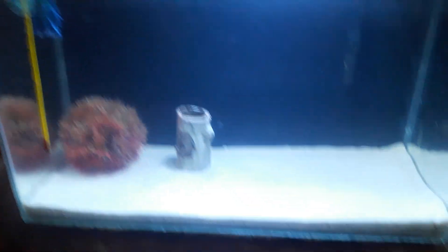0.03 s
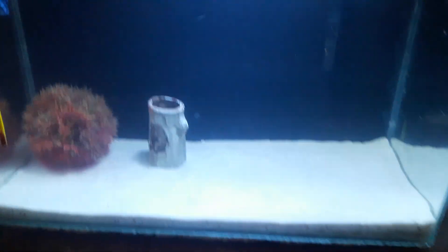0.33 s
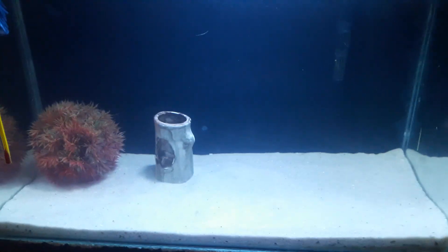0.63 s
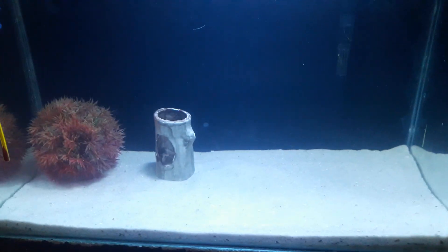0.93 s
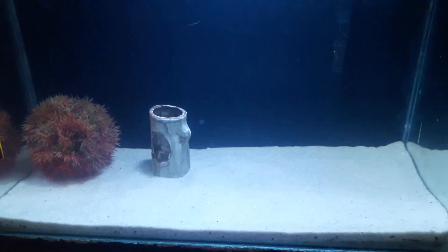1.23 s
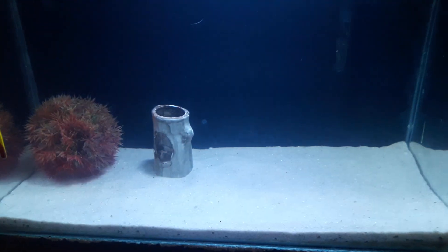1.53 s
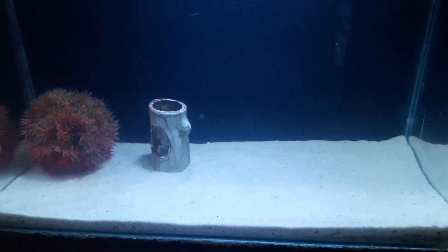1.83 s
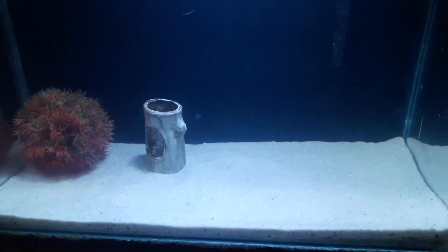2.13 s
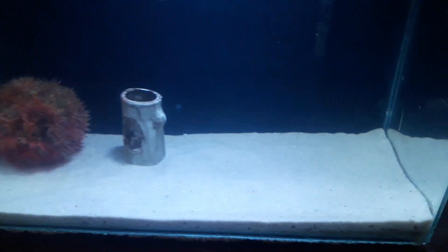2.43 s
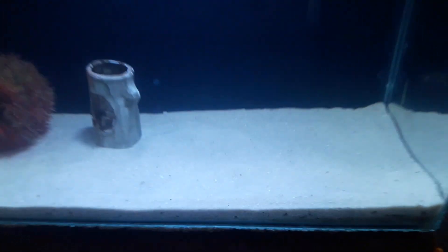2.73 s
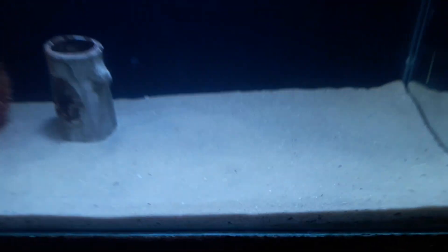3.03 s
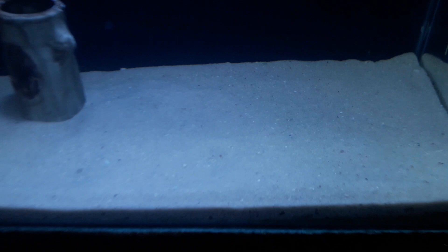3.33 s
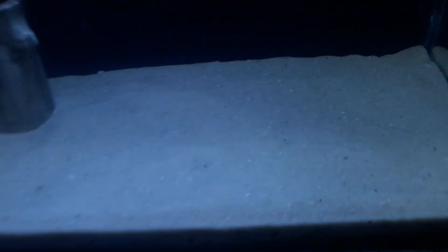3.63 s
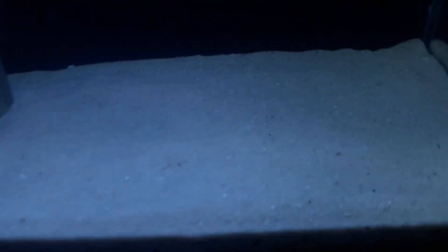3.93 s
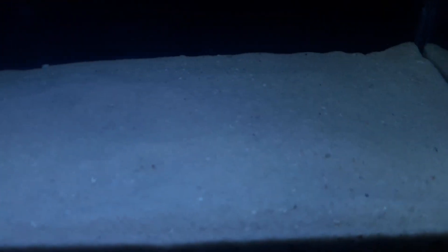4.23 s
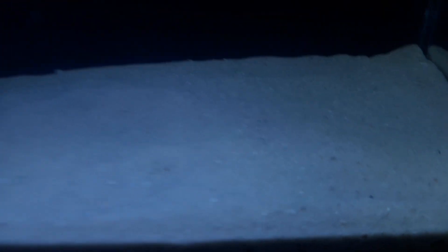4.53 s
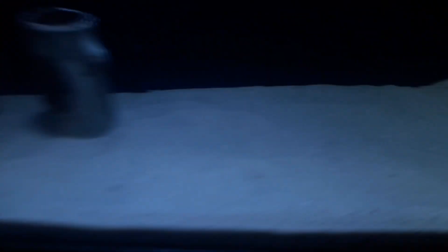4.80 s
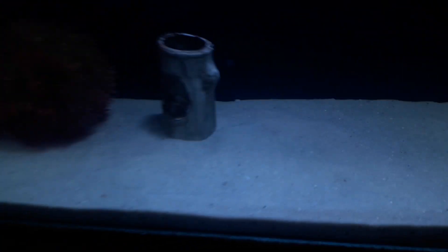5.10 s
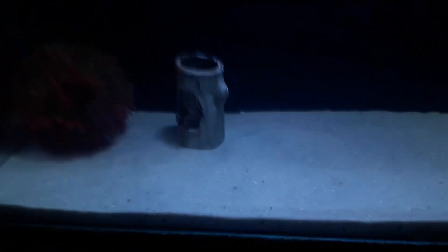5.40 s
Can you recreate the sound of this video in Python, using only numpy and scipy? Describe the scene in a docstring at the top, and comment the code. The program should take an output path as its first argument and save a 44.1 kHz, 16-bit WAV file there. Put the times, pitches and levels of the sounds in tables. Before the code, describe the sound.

From start to finish, nearly six seconds, an aquarium filter pours a thin stream into a glass tank. Round, hollow plops come irregularly, several each second, over a fine tinkling trickle, light slaps of drops and a soft fluttering hiss of spray. Tiny surface bubbles pop crisply, most clearly in the first two seconds. One brighter plop stands out at about 1.4 seconds, and fuller ones follow until about 3 seconds. The water rings slightly in the tank, with a short echo from the quiet room. Underneath, the pump gives a low, steady, slightly wavering hum.

From about 2.7 seconds the close, hand-held microphone leans in, so the tinkling softens a little and the hum changes tone; it draws back by 5.3 seconds. A faint dry handling tick sounds at about 0.1 seconds and a sharper one at 5.4 seconds.

```python
"""Round plops and a tinkling trickle: a hang-on filter pours a thin stream into an aquarium.
The stream drags air under, so big bubbles plop and small ones tinkle, while drops slap the water and
surface bubbles pop. The glass, the air in the tank and the walls of a quiet room throw the water back.
Behind it the pump hums on the mains and a few dry ticks sound right at the hand-held microphone,
which leans in and draws back, shifting the balance of hum and water."""
import sys
import numpy as np
from scipy import signal
from scipy.fft import rfft, irfft
from scipy.io import wavfile

SR = 44100
rng = np.random.default_rng(int(sys.argv[2]) if len(sys.argv) > 2 else 0)


def master(y):
    """Save y as 16-bit WAV."""
    cut = np.clip(np.atleast_2d(y).T, -1, 1)
    pcm = np.round(cut * 32767)  # scale
    wavfile.write(sys.argv[1], SR, pcm.astype(np.int16))


N = 249606
TIME = np.arange(N) / SR
FREQS = np.fft.rfftfreq(N, 1 / SR)


def amp(db):
    return 10 ** (np.asarray(db) / 20)


def unit_rms(x):
    return x / np.sqrt(np.mean(x ** 2) + 1e-20)


def curve_db(points, hz):
    """An EQ curve: straight lines between points on a log-frequency axis."""
    f, db = np.transpose(points)
    return np.interp(np.log(hz + 1), np.log(f + 1), db)


def add(mix, s, sound):
    part = mix[max(round(s * SR), 0):][:len(sound)]
    part += sound[:len(part)]


def noise(colour):
    """Steady coloured noise of rms 1."""
    return unit_rms(irfft(rfft(rng.standard_normal(N)) * amp(curve_db(colour, FREQS)), N))


def drift(rate_hz):
    """A smooth random modulator of rms 1."""
    spectrum = rfft(rng.standard_normal(N)) * np.exp(-(FREQS / rate_hz) ** 2) * (FREQS > 0)
    return unit_rms(irfft(spectrum, N))


def resonate(x, hz, q):
    return signal.lfilter(*signal.iirpeak(hz, q, SR), x)


def bell(x, hz, width_hz, db):
    """Boosts or cuts one band; db may be a curve."""
    return x + (amp(db) - 1) * resonate(x, hz, hz / width_hz)


def lean(s, start_s=2.71, in_s=1.0, end_s=5.26, out_s=0.52):
    """The microphone's move, 0 to 1: it leans in, holds and draws back."""
    return np.clip(np.minimum((s - start_s) / in_s, (end_s - s) / out_s), 0, 1)


# colour of the noise bed: f/Hz, relative level/dB
ROOM_TONE_EQ = [(20, -32), (45, -12), (65, -12), (88, -5.5), (110, -2), (160, -5), (220, 5), (290, -4.5),
                (420, -10), (700, -8), (1500, -30.5), (8500, -37), (12000, -35), (16000, -36)]
def room_tone(level_db=-52.5):
    """A steady bed of pump rumble, room air and microphone hiss."""
    return amp(level_db) * noise(ROOM_TONE_EQ)


# hum partials; leaning in crosses their standing waves: mains multiple, level/dB, change leaning in/dB
HUM_PARTIALS = [(2, -65.5, 7.5), (3, -55, 0.5), (4, -55.5, -4.5), (5, -68.5, 0.5), (7, -70.5, -2),
                (11, -61, -2)]
# fader curve of a faint drone that is no multiple of the mains: t/s, level/dB
DRONE_FADER = [(0.35, -81), (0.53, -60.5), (1.83, -66.5), (2.18, -75), (2.43, -61), (2.86, -79),
               (4.33, -67), (5.66, -83)]
def pump(mains_hz=60, drone_hz=88.7, drone_trim_db=-1, waver_db=2.0, waver_hz=12):
    """Mains harmonics and a low drone waver a little with the load on the impeller."""
    partials = [(round(k) * mains_hz, db + lean_db * lean(TIME)) for k, db, lean_db in HUM_PARTIALS]
    partials.append((drone_hz, drone_trim_db + np.interp(TIME, *np.transpose(DRONE_FADER))))
    out = np.zeros(N)
    for hz, db in partials:
        rms = amp(db + waver_db * drift(waver_hz))
        out += np.sqrt(2) * rms * np.sin(2 * np.pi * (hz * TIME + rng.random()))
    return out


# modes of the microphone's housing: f/Hz, relative level/dB, t60/s
HOUSING_MODES = [(137, -19, 0.016), (690, -12.5, 0.0087), (2350, -3.5, 0.0022), (4920, 5.5, 0.0022),
                 (6330, -3.5, 0.0036), (11250, -1, 0.0013)]
# taps on the housing: t/s, level/dB
TICK_CUES = [(0.1165, -38), (5.406, -35), (5.4153, -20)]
def ticks(size=3000):
    """Sharp taps ring the housing, too close to carry any room."""
    t, out = np.arange(size) / SR, np.zeros(N)
    tap = sum(amp(db - 60 * t / t60) * np.sin(2 * np.pi * hz * t) for hz, db, t60 in HOUSING_MODES)
    for s, db in TICK_CUES:
        add(out, s, -amp(db) * tap)
    return out


def room_reverb(x, t60=0.67, wet_db=-12, predelay_s=0.011, size=22000):
    """The walls answer with a short diffuse tail."""
    t = np.arange(size) / SR
    tail = rng.standard_normal(size) * amp(-60 * t / t60) * (t > predelay_s)
    return x + amp(wet_db) * signal.fftconvolve(x, tail / np.linalg.norm(tail))[:N]


# air resonances over the water: f/Hz, width/Hz, gain/dB
AIR_MODES = [(866, 28, 2.5), (958, 24, 2), (990, 20, -3), (1242, 18, -1), (1668, 16, 3.5), (1860, 16, 0),
             (2117, 26, 2), (2252, 14, -1), (2410, 14, 7), (2450, 16, 3), (2706, 13, 7.5), (3290, 24, -1)]
def tank_ring(x):
    """The air between glass and water rings on at a few pitches."""
    return sum(amp(db) * resonate(x, hz, hz / width) for hz, width, db in AIR_MODES)


# dips between the tank's resonances: f/Hz, width/Hz, gain/dB
TANK_DIPS = [(1057, 70, -6.5), (1770, 30, -4), (2280, 200, -4.5)]
def tank_hollow(x, rim_db=-2.5):
    """The tank swallows a few bands, and its rim shades the mids as the microphone leans in."""
    for hz, width, db in TANK_DIPS:
        x = bell(x, hz, width, db)
    return bell(x, hz=1280, width_hz=500, db=rim_db * lean(TIME))


# fader curve of the stream's splashing: t/s, level/dB
STREAM_FADER = [(0.0, -48.5), (0.22, -50), (2.47, -50.5), (3.39, -50.5), (3.78, -51.5), (5.49, -49),
                (5.66, -57.5)]
def stream_db(s):
    """How hard the stream splashes, in dB about the mean of the fader points."""
    times, db = np.transpose(STREAM_FADER)
    return np.interp(s, times, db - np.mean(db))


# colour of water striking water: f/Hz, relative level/dB
SPRAY_EQ = [(400, -55), (700, 1.5), (950, 0), (1300, -4), (2400, -13.5), (3200, -15.5), (4200, -18),
            (6800, -24), (8300, -49.5), (12000, -34), (16000, -29.5)]
def spray(level_db=-55.5, follow=1.53, lean_db=1.5, flutter_db=3.5, flutter_hz=30):
    """The finest spray merges into a fluttering hiss that lifts a little as the microphone leans in."""
    fader_db = level_db + follow * stream_db(TIME) + lean_db * lean(TIME)
    return noise(SPRAY_EQ) * amp(fader_db + flutter_db * drift(flutter_hz))


def burst(attack_s, decay_s, tail_db, tail_s, size):
    """A noise transient with a fast attack, a quick decay and a quiet tail."""
    t = np.arange(size) / SR
    envelope = (1 - np.exp(-t / attack_s)) * (np.exp(-t / decay_s) + amp(tail_db) * np.exp(-t / tail_s))
    return envelope * rng.standard_normal(size)


def pop(hz):
    """A bubble's skin bursts: a very high tick, a pitched core in a wide skirt, smeared by the glass."""
    snap = burst(attack_s=0.0012, decay_s=0.006, tail_db=-14, tail_s=0.08, size=5000)
    skirt = resonate(snap, hz, q=0.83)
    sound = resonate(skirt, hz, q=8)
    return sound / abs(sound).max()


# the crispest surface pops: t/s, level/dB, f/Hz
POP_CUES = [(0.019, -49, 13700), (0.0957, -45, 13000), (0.165, -53, 8200), (0.2, -46.5, 11300),
            (0.929, -42, 14200), (1.041, -49, 12100), (1.346, -51, 14600), (1.499, -53, 9800),
            (1.673, -53, 11900), (1.7135, -49, 13000), (1.8347, -47, 13300), (4.044, -41, 9550)]
def surface_pops(cue_trim_db=-1, per_s=34, crackle_db=-59.5, spread_db=3.5, lean_db=-3,
                 low_hz=9800, high_hz=15300, count=300):
    """Bubbles burst on the surface: crisp accents over a fine random crackle."""
    out = np.zeros(N)
    for s, db, hz in POP_CUES:
        add(out, s, amp(db + cue_trim_db) * pop(hz))
    draws = zip(rng.random((count, 2)), rng.standard_normal(count))
    for slot, ((jitter, smallness), strength) in enumerate(draws):
        s = (slot + 2 * jitter) / per_s
        db = crackle_db + stream_db(s) + lean_db * lean(s) + spread_db * min(strength, 2)
        add(out, s, amp(db) * pop(low_hz * (high_hz / low_hz) ** smallness))
    return out


# colour of a drop's slap: f/Hz, relative level/dB
SLAP_EQ = [(500, -40), (1000, 10.5), (2400, 3.5), (3100, -7), (4400, -5.5), (6800, -10.5), (8300, -18),
           (12000, -20), (16000, -28)]
def slap(boost_hz, boost_db=14, boost_octaves=0.54, size=6000):
    """A drop hits the water; the panes smear it into a short grainy burst with one band boosted."""
    hit = burst(attack_s=0.0016, decay_s=0.0076, tail_db=-11, tail_s=0.089, size=size)
    hz = np.fft.rfftfreq(2 * size, 1 / SR)
    boost = boost_db * np.exp(-(np.log2((hz + 1) / boost_hz) / boost_octaves) ** 2)
    sound = irfft(rfft(hit, 2 * size) * amp(curve_db(SLAP_EQ, hz) + boost))[:size]
    return sound / abs(sound).max()


# the sharpest drop hits and their boosted bands: t/s, level/dB, f/Hz
DROP_CUES = [(0.3473, -33.5, 3870), (0.5167, -41.5, 3270), (1.0837, -40.5, 3950), (1.222, -39, 4400),
             (1.3447, -36.5, 4700), (1.5982, -38, 4830), (1.673, -35.5, 3900), (1.712, -40, 5900),
             (1.8622, -43, 4000), (2.266, -34.5, 2370), (2.349, -35, 3500), (2.7045, -37, 3860),
             (2.9366, -39, 4840), (3.114, -35.5, 2550), (3.262, -35, 1250), (3.426, -43.5, 6100),
             (3.531, -39.5, 2060), (3.9656, -38, 5360), (4.084, -38.5, 1600), (4.342, -38.5, 2710),
             (4.7442, -38, 5100), (5.213, -35.5, 2870), (5.249, -37.5, 2800), (5.602, -37.5, 2050),
             (5.635, -29.5, 1390)]
def spatter(per_s=50, light_db=-50.5, spread_db=3, lean_db=-2, low_hz=1300, high_hz=7000, count=400):
    """Sharp drop hits among lighter random ones; each drop's size favours its own band."""
    out = np.zeros(N)
    for s, db, hz in DROP_CUES:
        add(out, s, amp(db) * slap(hz))
    draws = zip(rng.random(count), rng.standard_normal(count))
    for slot, (jitter, strength) in enumerate(draws):
        s = (slot + 2 * jitter) / per_s
        if s < N / SR:
            db = light_db + stream_db(s) + lean_db * lean(s) + spread_db * min(strength, 2)
            add(out, s, amp(db) * slap(low_hz * (high_hz / low_hz) ** rng.random()))
    return out


def bubble(hz, decay_cycles=5.64, attack_cycles=0.47, glass_db=-7.0, glass_t60=0.17, size=8000):
    """A pinched-off bubble swells and rings out, with quick reflections between the panes."""
    t, smallness = np.arange(size) / SR, hz / 950
    cycles = hz * t
    attack = 1 - np.exp(-cycles / attack_cycles)
    decay = np.exp(-cycles / decay_cycles * smallness ** 0.051)  # small bubbles die in fewer cycles
    ring = unit_rms(np.sin(2 * np.pi * cycles) * attack * decay)
    paths = rng.standard_normal(size) * amp(-60 * t / glass_t60) * np.clip(t / 0.0011 - 0.5, 0, 1)
    reflections = unit_rms(signal.fftconvolve(ring, paths)[:size])
    wet_db = glass_db + 5.0 * np.log2(smallness)  # the glass shades the direct treble
    sound = ring + amp(wet_db) * reflections
    return sound / abs(sound).max()


# bubble swarms, shaded by the rim: low f/Hz, high f/Hz, rate/(1/s), level/dB, change leaning in/dB
BUBBLE_SWARMS = [(735, 1054, 24, -50, -0.5), (1157, 2680, 85, -50, -5), (2940, 7130, 45, -56, -2)]
def trickle(spread_db=3.5, follow=0.98, max_per_swarm=400):
    """Faint bubbles tinkle at random, no two alike, louder when the stream splashes harder."""
    out = np.zeros(N)
    for low_hz, high_hz, per_s, swarm_db, lean_db in BUBBLE_SWARMS:
        draws = zip(rng.random((max_per_swarm, 2)), rng.standard_normal(max_per_swarm))
        for slot, ((jitter, smallness), strength) in enumerate(draws):
            s = (slot + 2 * jitter) / per_s
            if s < N / SR:
                db = swarm_db + follow * stream_db(s) + lean_db * lean(s) + spread_db * min(strength, 2)
                add(out, s, amp(db) * bubble(low_hz * (high_hz / low_hz) ** smallness, size=4000))
    return out


# foreground bubbles; most plop near 950 Hz, a few tiny ones tinkle: t/s, level/dB, f/Hz
PLOP_CUES = [(0.02, -39.5, 950), (0.095, -32, 976), (0.155, -32, 898), (0.219, -33.5, 3920),
             (0.346, -31, 2130), (0.451, -44, 4200), (0.464, -37, 930), (0.488, -36.5, 2430),
             (0.512, -37, 2440), (0.601, -29.5, 900), (0.604, -33, 2690), (0.617, -33.5, 2650),
             (0.741, -38, 1500), (0.85, -33.5, 1020), (0.863, -30.5, 815), (0.904, -35, 976),
             (0.93, -33.5, 847), (0.957, -34.5, 880), (1.017, -35.5, 960), (1.023, -40, 4040),
             (1.154, -34.5, 1215), (1.217, -33.5, 924), (1.344, -36.5, 770), (1.3665, -21.5, 1520),
             (1.394, -37.5, 920), (1.531, -28.5, 2174), (1.578, -25.5, 925), (1.721, -28.5, 970),
             (1.949, -26.5, 864), (1.963, -29.5, 883), (2.105, -36.5, 910), (2.266, -29.5, 2030),
             (2.291, -25, 963), (2.321, -29, 905), (2.404, -40.5, 927), (2.443, -33, 1640),
             (2.6, -25.5, 908), (2.654, -34, 927), (2.749, -25, 1010), (2.799, -30.5, 1210),
             (2.878, -29, 932), (2.999, -40, 4130), (3.113, -29.5, 946), (3.245, -41.5, 6230),
             (3.265, -29, 1260), (3.529, -29, 880), (3.893, -39.5, 914), (4.083, -30.5, 726),
             (4.158, -35, 756), (4.267, -35.5, 790), (4.479, -34.5, 956), (4.515, -40.5, 4900),
             (4.6471, -30.5, 908), (4.692, -29.5, 767), (4.706, -32, 980), (4.707, -36.5, 1680),
             (4.756, -30.5, 887), (4.79, -29, 947), (4.847, -33.5, 1610), (4.858, -41.5, 2450),
             (4.982, -31, 792), (4.984, -38.5, 370), (5.045, -43, 5740), (5.088, -35.5, 953),
             (5.185, -31, 970), (5.21, -30.5, 2100), (5.361, -32.5, 2090), (5.474, -30, 890),
             (5.528, -31.5, 732), (5.585, -33, 744), (5.599, -30.5, 665), (5.602, -28.5, 2070)]
def plops(ring_trim_db=-2.0, large_below_hz=1300, slap_db=-15, shed_db=-17.0, shed_s=0.063, shed_count=3,
          echo_s=0.017, echo_spread_s=0.00217, echo_db=-7):
    """Clear single bubbles; large ones start with a slap, echo off the wall and shed small bubbles."""
    out = np.zeros(N)
    for s, db, hz in PLOP_CUES:
        ring = amp(db + ring_trim_db) * bubble(hz)
        add(out, s, ring)
        if hz < large_below_hz:
            delay_s = echo_s + echo_spread_s * rng.uniform(-0.92, 1)  # varies with where the bubble forms
            add(out, s + delay_s, amp(echo_db) * ring)
            add(out, s, amp(db + slap_db) * slap(boost_hz=1800))
            for wait, smallness in rng.random((shed_count, 2)):
                add(out, s + shed_s * wait, amp(db + shed_db) * bubble(hz * 2.32 ** smallness))
    return out


def scene(plop_send_db=-4, texture_send_db=1.5):
    """A mono mix on both channels: the water feeds tank and room; pops and background stay dry."""
    lead, hiss, crackle = plops(), spray(), surface_pops()
    background = pump() + room_tone() + ticks()
    texture = hiss + spatter() + trickle()
    bright_lead = bell(lead, hz=2500, width_hz=700, db=8)  # higher bubbles ring the tank's air best
    tank_send = amp(texture_send_db) * texture + amp(plop_send_db) * bright_lead
    water = room_reverb(tank_hollow(lead + texture + tank_ring(tank_send)))
    mono = water + crackle + background
    return np.array([mono, mono])


def record(dry, low_cut_hz=42, hiss_db=-78, high_cut_hz=15900):
    """The microphone's low cut, faint treble hiss in each channel, then a steep high cut."""
    heard = signal.sosfilt(signal.butter(2, low_cut_hz, "high", fs=SR, output="sos"), dry)
    hiss_eq = [(5000, 1.5), (9000, -6), (13000, 19.0), (16000, -8)]  # f/Hz, relative level/dB
    hiss = amp(hiss_db) * np.array([noise(hiss_eq), noise(hiss_eq)])
    high_cut = signal.firwin(511, high_cut_hz, window=("kaiser", 9), fs=SR)
    return signal.oaconvolve(heard + hiss, high_cut[None], "same")


dry = scene()
out = record(dry)
master(out)
```